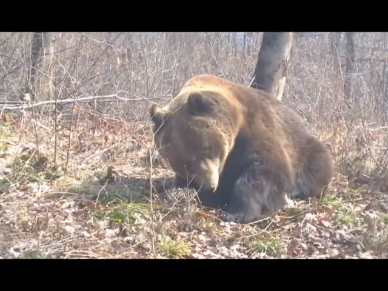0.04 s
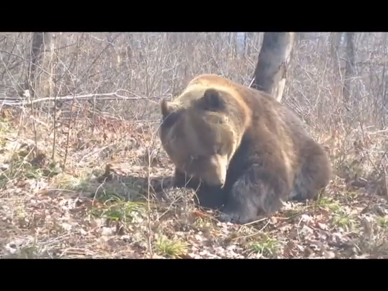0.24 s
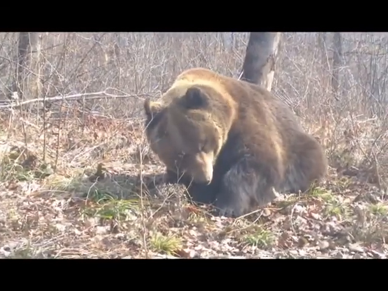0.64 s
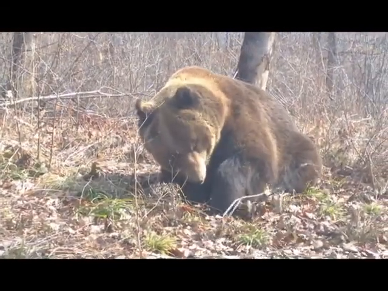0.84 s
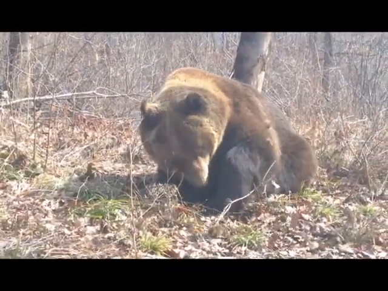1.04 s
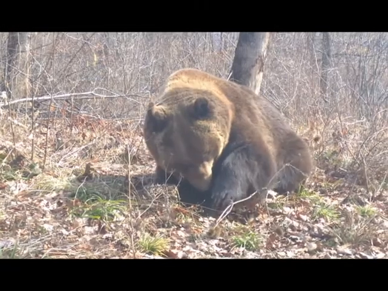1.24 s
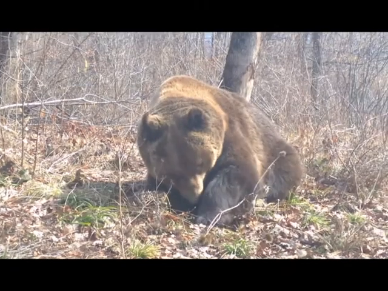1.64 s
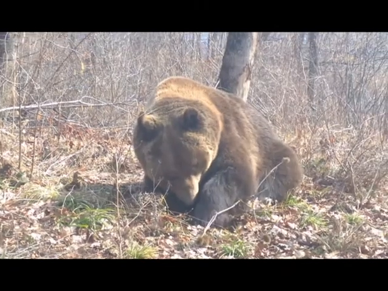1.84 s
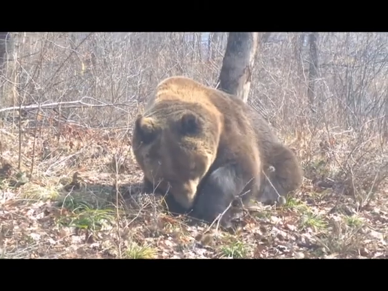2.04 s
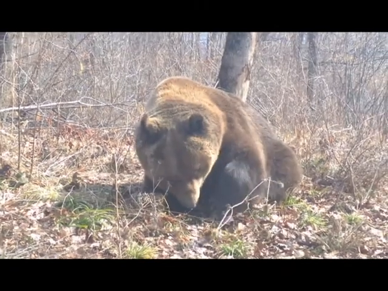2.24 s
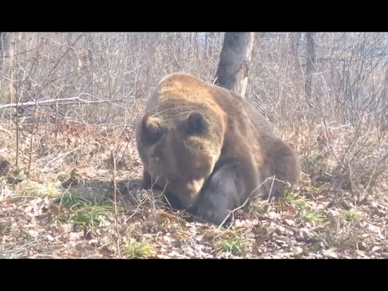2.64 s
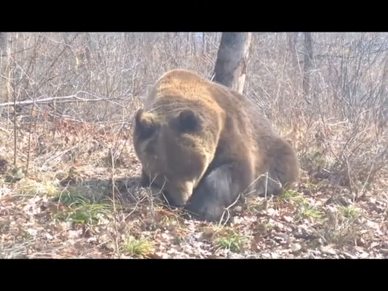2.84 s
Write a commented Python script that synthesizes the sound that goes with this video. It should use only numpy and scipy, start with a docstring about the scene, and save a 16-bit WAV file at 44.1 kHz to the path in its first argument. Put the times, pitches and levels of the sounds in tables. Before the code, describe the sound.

A bear digs in dry leaves, snapping twigs, while a crow caws twice.

```python
"""A bear digs in dry leaves at the edge of a wood: litter crunches under its paws, twigs snap.
A crow gives two rattling caws, each a raspy tone chopped into bursts. A songbird whistles
falling slurs among short chirps; the trunks scatter echoes. A hand-held camera knocks and
scuffs softly, close to its right microphone. Woodland hiss and low rumble lie underneath."""
import sys
import numpy as np
from scipy import signal
from scipy.fft import rfft, irfft
from scipy.io import wavfile
from scipy.ndimage import uniform_filter1d

SR = 44100
rng = np.random.default_rng(int(sys.argv[2]) if len(sys.argv) > 2 else 0)


def put_to_file(sound):
    """Save the sound as 16-bit audio at rate SR, in the file named by the first command-line argument."""
    columns = np.atleast_2d(sound).T  # one column per channel
    safe = np.clip(columns, -1, 1)
    whole_steps = np.round(safe * 32767)
    wavfile.write(sys.argv[1], SR, whole_steps.astype(np.int16))


N = 132300
TIME_S = np.arange(N) / SR

# Stereo image. Each row: frequency in Hz, left-right correlation.
STEREO_LIKENESS = [(30, 0.56), (300, 0.64), (700, 0.99), (1500, 0.52), (4000, 0.77), (8000, 0.35),
                   (15000, 0.16)]
# Echo among the trunks. Each row: frequency in Hz, time to fall 60 dB in seconds.
WOOD_DECAY = [(200, 0.4), (1200, 0.66), (4000, 0.72), (15000, 0.05)]
# Distant woodland hiss. Each row: frequency in Hz, gain in dB.
HISS_SPECTRUM = [(30, 12), (200, 6.5), (500, 1), (1200, -1.5), (2000, -5), (3500, -11), (6000, -12),
                 (9500, -28), (12500, -6.5), (16000, -22)]
# Rumble at the microphones. Each row: frequency in Hz, left gain in dB, right gain in dB.
RUMBLE_SPECTRUM = [(14.8, -15, -4.5), (45, -1, 3.5), (68, -10, 2), (121, -14.5, -2), (210, -20, -15),
                   (376, -56, -21.5), (1000, -69, -29), (16000, -88, -95)]
# Paw strokes. Each row: time in seconds, crunch level in dB, crackle level in dB.
PAW_ENVELOPE = [(0, -77, -78.5), (.6, -73.5, -76), (.84, -69, -75.5), (.895, -65, -73), (.925, -45, -45.5),
                (.965, -48, -49), (1.0, -57.5, -57.5), (1.08, -54.5, -54), (1.19, -57.5, -64),
                (1.27, -69.5, -73.5), (1.37, -72, -76), (1.45, -59.5, -65.5), (1.6, -63.5, -63),
                (1.7, -65, -76.5), (1.8, -67, -73.5), (1.989, -59, -74), (2.06, -53.5, -55.5),
                (2.15, -49, -46.5), (2.185, -57.5, -56.5), (2.32, -54, -58.5), (2.4, -60, -64.5),
                (2.455, -64, -60.5), (2.51, -72, -69.5), (2.62, -68, -69.5), (2.714, -58.5, -51),
                (2.735, -60.5, -68.5), (2.82, -62, -63.5), (2.86, -66, -71), (3.0, -71.5, -68)]
# Leaf crunch and treble crackle. Each row: frequency in Hz, gain in dB.
CRUNCH_SPECTRUM = [(100, -5), (600, -12.5), (1400, -3.5), (2200, -8.5), (3500, 0.5), (5000, -1.5),
                   (6800, -6.5), (9000, -23), (16000, -34)]
CRACKLE_SPECTRUM = [(100, -65), (3000, -31), (6000, -1.5), (8000, -2), (12500, -1), (16000, -11)]
# Caws; the first is heard only as echo. Each row: start in seconds, level in dB.
CAW_EVENTS = [(-.45, -30), (1.7851, -36.5), (2.1664, -36)]
# Crow's tone. Each row: harmonic number, level in dB.
CROW_HARMONICS = [(2, -19.5), (3, -1), (4, -29), (5, -28), (8, -22.5)]
# Crow's rasp. Each row: frequency in Hz, gain in dB.
RASP_SPECTRUM = [(300, -39), (800, -17), (1250, 8), (1600, -7.5), (2100, -22), (3200, -7), (5000, -25),
                 (15000, -60)]
# Reflections off the nearest trunks. Each row: delay in seconds, gain in dB.
TRUNK_REFLECTIONS = [(.0075, -21), (0.028, -13.5)]
# Falling whistles. Each row: start and length in seconds, level in dB, base pitch in Hz, echo in dB.
WHISTLE_NOTES = [(0.306, 0.18, -55.5, 3854, -8), (0.851, 0.23, -63.5, 3850, 0),
                 (1.484, 0.22, -63.5, 3680, 3)]
# Chirps. Each row: start and length in seconds, level in dB, first, middle and last pitch in Hz.
CHIRP_NOTES = [(.01, 0.015, -68.5, 3820, 3530, 3530), (0.107, 0.019, -73.5, 2490, 3240, 3680),
               (1.294, 0.036, -62.5, 4000, 4400, 3660), (1.377, 0.026, -60, 4930, 3900, 3050),
               (1.452, 0.0162, -55, 4450, 3480, 2800), (1.522, 0.0167, -53.5, 3860, 3570, 3180)]
# Knocks on the case. Each row: start in seconds, relative level in dB, tilt in dB per octave.
KNOCK_EVENTS = [(0.2425, -27.5, -5), (0.3639, -20.5, 3.5), (0.456, -25.5, -1.5), (0.4839, -26, -1.5),
                (0.5785, -24, -2.5), (0.6692, -25.5, 1.5), (0.7046, -22, -0.5), (0.787, -22, -0.5),
                (1.0835, -23, -.5), (1.1635, -23.5, 3), (2.2409, -31, 5.5), (2.57, -31, -1)]
# Paths through the case to each microphone. Each row: frequency in Hz, gain in dB.
CASE_LEFT_PATH = [(25, -91), (70, -8.5), (120, -22), (320, -16.5), (460, -17), (650, -22.5), (1100, -25.5),
                  (1500, -43), (2100, -34.5), (5000, -53.5), (15000, -88)]
CASE_RIGHT_PATH = [(25, -16.5), (62, -0.5), (110, -1.5), (210, 1), (300, -5.5), (350, -18.5), (410, 0),
                   (470, 0.5), (600, -11.5), (720, -10.5), (790, -28), (930, -9), (1250, -18.5),
                   (1550, -22.5), (3200, -30), (5000, -43.5), (15000, -67.5)]
# Case flexing, left then right. Each row: centre in Hz, Q.
FLEX_MODES = [(626, 2.3), (66, 0.62)]
# Twig snaps. Each row: start in seconds, level in dB, decay in seconds, tilt in dB per octave,
# ring in Hz.
SNAP_EVENTS = [(.3378, -46, 0.0009, -4.5, 4270), (0.6398, -53, 0.0077, 4, 3180),
               (0.8554, -39, 0.0012, 0, 6700), (0.863, -38, 0.0028, -2, 3540),
               (0.8659, -28.5, 0.0029, -3.5, 4170), (.8695, -38.5, 0.0027, 11, 4500),
               (0.8759, -41, 0.0075, -2.5, 3940), (0.8768, -30, 0.0018, 0.5, 11800),
               (0.8811, -38.5, 0.0026, 12, 6200), (0.9126, -36, 0.00093, -3, 6800),
               (.9285, -44, .0012, -7, 4960), (0.96, -43.5, 0.0027, -1, 7040),
               (1.0138, -53.5, 0.0011, 1, 6570), (1.072, -46, .001, 11, 6800),
               (1.191, -48.5, 0.0049, -6.5, 6140), (1.7261, -47, 0.0015, 5, 3450),
               (1.7432, -38, 0.0034, -1.5, 3550), (1.874, -43, 0.0014, -2, 4130),
               (1.947, -29.5, 0.0011, -6.5, 1470), (1.975, -37.5, 0.0011, -7, 2940),
               (1.9847, -41.5, 0.00064, -10, 3600), (2.016, -46.5, 0.0012, 15, 6500),
               (2.0277, -49, 0.00088, -2, 6000), (2.0601, -33, 0.0014, 2, 3450),
               (2.098, -41, 0.0017, -5, 6160), (2.4248, -52, 0.0047, -4, 4930),
               (2.439, -50, 0.0088, 4, 5040), (2.456, -49, 0.0081, 3, 5850), (2.468, -48, 0.0028, 4, 5000),
               (2.567, -50.5, 0.0018, -0.5, 11460), (2.812, -66, 0.0014, -1, 6840),
               (2.9104, -53.5, 0.0021, -3, 4300), (2.932, -50.5, 0.00071, -1, 5300)]
# Breaking twig. Each row: frequency in Hz, gain in dB.
TWIG_SPECTRUM = [(60, -22), (300, -30), (700, -3.5), (1700, -10), (3000, -4), (4200, -0.5), (6000, -6.5),
                 (9000, -9.5), (13000, -13.5), (16000, -34)]
# Rub on the case. Each row: time in seconds, level in dB.
SCUFF_ENVELOPE = [(1.39, -87), (1.403, -49), (1.426, -37), (1.437, -43.5), (1.455, -44.5), (1.5, -53),
                  (1.57, -68.5), (1.62, -102.5)]
# Colour of the rub. Each row: frequency in Hz, left gain in dB, right gain in dB.
SCUFF_SPECTRUM = [(60, -36, -6.5), (198, -12, -11.5), (313, -23, 1.5), (448, -18, 3), (600, -24, -10.5),
                  (1060, -32, -22), (2240, -22, -30), (4000, -49, -50), (14600, -52, -60)]


def amp(db):
    """Decibels to gain."""
    return 10 ** (np.asarray(db) / 20)


def unit(x):
    """Scales to rms 1."""
    return x / np.sqrt(np.mean(x ** 2) + 1e-20)


def read(points, hz):
    """Interpolates a table on a log-frequency axis."""
    points_hz, value = np.transpose(points)
    return np.interp(np.log(hz + 1), np.log(points_hz + 1), value)


def bins_hz(x):
    """Frequencies of the spectrum of x."""
    return np.fft.rfftfreq(x.shape[-1], 1 / SR)


def colour(x, points):
    """Filters x by rows of Hz, dB."""
    return irfft(rfft(x) * amp(read(points, bins_hz(x))), x.shape[-1])


def minimum_phase(db):
    """Impulse response with this spectrum; starts at once and dies away."""
    log_gain = np.log(amp(np.concatenate([db, db[-2:0:-1]])))
    return np.fft.ifft(np.exp(np.conj(signal.hilbert(log_gain)))).real


def add(mix, start_s, sound):
    """Mixes a sound in at start_s."""
    part = mix[..., max(round(start_s * SR), 0):][..., :sound.shape[-1]]
    part += sound[..., :part.shape[-1]]


def wander(cutoff_hz):
    """Low-passed noise, rms 1."""
    return unit(irfft(rfft(rng.standard_normal(N)) / (1 + (bins_hz(TIME_S) / cutoff_hz) ** 4), N))


def smooth_noise(count, width):
    """Moving average of noise, rms 1."""
    return unit(uniform_filter1d(rng.standard_normal(count), size=width))


def spread(pair):
    """Two independent signals to a partly correlated left and right."""
    a, b = rfft(pair)
    likeness = np.clip(read(STEREO_LIKENESS, bins_hz(pair)), 0, 1)
    mid, side = a * np.sqrt((1 + likeness) / 2), b * np.sqrt((1 - likeness) / 2)
    return irfft(np.array([mid + side, mid - side]), pair.shape[-1])


def microphone_noise(spectrum):
    """Independent coloured noise at each microphone."""
    hz, *sides_db = np.transpose(spectrum)
    return unit(np.array([colour(rng.standard_normal(N), np.c_[hz, db]) for db in sides_db]))


def wood_echo(x, echoes_per_s=1500):
    """Scattered echoes from the trunks, different at each microphone."""
    taps = rng.standard_normal((2, SR)) * (rng.random((2, SR)) < echoes_per_s / SR)
    hz, t, frames = signal.stft(taps, SR, nperseg=256)
    tail = signal.istft(frames * amp(-60 * t / read(WOOD_DECAY, hz)[:, None]), SR)[1]
    return signal.fftconvolve(np.atleast_2d(x), tail / np.linalg.norm(tail[0]), axes=1)[:, :x.shape[-1]]


def background(hiss_db=-69.5, rumble_db=-58, lumps_db=2):
    """Steady woodland hiss and a lumpy rumble at the microphones."""
    hiss = amp(hiss_db) * unit(colour(spread(rng.standard_normal((2, N))), HISS_SPECTRUM))
    return hiss + microphone_noise(RUMBLE_SPECTRUM) * amp(rumble_db + lumps_db * wander(cutoff_hz=38))


def leaf_litter(spectrum, level_db, grains_per_s=1500, size_spread_db=4.0, wash=0.7, flutter_db=1.5):
    """Thousands of tiny leaf fractures over a wash of sliding leaves."""
    sizes = amp(size_spread_db * np.minimum(rng.exponential(1, (2, N)), 5))
    signs = np.sign(rng.standard_normal((2, N)))
    grains = unit(sizes * signs * (rng.random((2, N)) < grains_per_s / SR))
    leaves = unit(colour(spread(grains + wash * rng.standard_normal((2, N))), spectrum))
    return leaves * amp(level_db + flutter_db * wander(cutoff_hz=31))


def bear_digging(left_db=-3, right_db=-1.5):
    """Paw strokes crunch and crackle through the litter and break twigs."""
    times_s, crunch_db, crackle_db = np.transpose(PAW_ENVELOPE)
    crunch = leaf_litter(CRUNCH_SPECTRUM, np.interp(TIME_S, times_s, crunch_db))
    crackle = leaf_litter(CRACKLE_SPECTRUM, np.interp(TIME_S, times_s, crackle_db))
    return (crunch + crackle + twig_snaps()) * amp([[left_db], [right_db]])


def caw(bursts=11, bursts_per_s=55.4, pitch_hz=393.8, rasp_db=-11.5):
    """A raspy nasal tone chopped into bursts; they swell and slow at first, and pitch lifts in each."""
    rise_s, hold_s, fall_s = 0.0016, 0.0086, 0.0019
    hurry_s, jitter_s = 0.0045, 0.00034
    onset_db, swell_s = -10.5, 0.02
    bend_depth, waver_depth, roughness = 0.056, 0.02, 0.043
    t = np.arange(SR // 4) / SR
    gate, bend = np.zeros((2, len(t)))
    for k in range(bursts):
        start_s = k / bursts_per_s - hurry_s * (1 - np.exp(-k / 2))
        age_s = np.maximum(t - start_s + jitter_s * rng.standard_normal(), 0)
        burst = np.minimum(age_s / rise_s, 1) * np.exp(-np.maximum(age_s - hold_s, 0) / fall_s)
        gate += burst * amp(onset_db * np.exp(-start_s / swell_s))
        bend += burst * (age_s / hold_s - .5)
    waver = smooth_noise(len(t), width=40)
    cycles = np.cumsum(pitch_hz * (1 + bend_depth * (bend - bend.mean()) + waver_depth * waver)) / SR
    tone = sum(amp(db) * np.sin(2 * np.pi * round(k) * cycles) for k, db in CROW_HARMONICS)
    rasp = amp(rasp_db) * unit(colour(rng.standard_normal(len(t)), RASP_SPECTRUM))
    return gate * (tone * (1 + roughness * waver) + rasp)


def crow(right_lag_s=0.0001, echo_db=-8, flicker_depth=0.9):
    """Caws, their reflections off the nearest trunks and a flickering echo in the wood."""
    voice = np.zeros(N + SR)  # 1 s lead-in holds the earliest caw
    for start_s, db in CAW_EVENTS:
        add(voice, start_s + 1, amp(db) * caw())
    voice += sum(amp(db) * np.roll(voice, round(delay_s * SR)) for delay_s, db in TRUNK_REFLECTIONS)
    near = np.array([voice, np.roll(voice, round(right_lag_s * SR))])
    flicker = unit(1 + flicker_depth * np.resize(wander(cutoff_hz=55), len(voice)))
    return (near + amp(echo_db) * wood_echo(voice * flicker))[:, SR:]


def bird_note(pitch_hz, db):
    """A pure tone along a pitch curve, with soft ends."""
    envelope = np.sqrt(np.sin(np.linspace(0, np.pi, len(pitch_hz))).clip(0))
    return amp(db) * envelope * np.sin(2 * np.pi * np.cumsum(pitch_hz) / SR)


def songbirds(swoop_hz=1404, swoop_s=0.018, sag_hz_per_s=4500, chirp_echo_db=-4, flutter_db=3.5):
    """Whistles swoop down, then sag; chirps are short bent notes. Far birds are mostly echo."""
    song, echo_send = np.zeros((2, N))
    for start_s, length_s, db, base_hz, echo_db in WHISTLE_NOTES:
        t = np.arange(0, length_s, 1 / SR)
        note = bird_note(base_hz + swoop_hz * np.exp(-t / swoop_s) - sag_hz_per_s * t, db)
        add(song, start_s, note)
        add(echo_send, start_s, amp(echo_db) * note)
    for start_s, length_s, db, *pitches_hz in CHIRP_NOTES:
        parabola = np.polyfit([0, .5, 1], pitches_hz, 2)
        note = bird_note(np.polyval(parabola, np.linspace(0, 1, round(length_s * SR))), db)
        add(song, start_s, note)
        add(echo_send, start_s, amp(chirp_echo_db) * note)
    return song * unit(amp(flutter_db * wander(cutoff_hz=54))) + wood_echo(echo_send)


def case_flex(x, centre_hz, q):
    """All-pass: the flexing case delays frequencies near centre_hz."""
    s = 1j * bins_hz(x) / centre_hz
    return irfft(rfft(x) * (s * s - s / q + 1) / (s * s + s / q + 1), len(x))


def case_knocks(gain_db=33, tilt_corner_hz=494, uneven_db=3, left_lag_s=0.0003):
    """Each knock is one click through the camera case to both microphones."""
    out, hz = np.zeros((2, N)), np.fft.rfftfreq(4096, 1 / SR)
    octaves = np.log2(1 + hz / tilt_corner_hz)
    for start_s, db, tilt in KNOCK_EVENTS:
        touch_db = gain_db + db + tilt * octaves + uneven_db * smooth_noise(len(hz), width=30)
        add(out[0], start_s + left_lag_s, minimum_phase(read(CASE_LEFT_PATH, hz) + touch_db))
        add(out[1], start_s, minimum_phase(read(CASE_RIGHT_PATH, hz) + touch_db))
    return np.array([case_flex(side, *mode) for side, mode in zip(out, FLEX_MODES)])


def twig_snaps(rise_s=0.00008, ring_db=9, ring_octaves=0.23, uneven_db=3, gain=1.303, echo_db=-11):
    """Each twig cracks in a burst of a few milliseconds, with one broad ring and chance resonances."""
    out, t = np.zeros((2, N)), np.arange(2048) / SR
    hz = bins_hz(t)
    for start_s, db, decay_s, tilt, ring_hz in SNAP_EVENTS:
        peak_db = ring_db / (1 + (np.log2((hz + 1) / ring_hz) / ring_octaves) ** 2)
        ripple_db = uneven_db * smooth_noise(len(hz), width=24)
        spectrum_db = read(TWIG_SPECTRUM, hz) + peak_db + ripple_db + tilt * np.log2(.2 + hz / 4000)
        fibres = unit(colour(spread(rng.standard_normal((2, len(t)))), np.c_[hz, spectrum_db]))
        envelope = np.minimum(t / rise_s, 1) * np.exp(-t / decay_s)
        add(out, start_s, gain * amp(db) * fibres * envelope)
    return out + amp(echo_db) * wood_echo(out)


def case_scuff(trim_db=-1.5):
    """A short, low rub on the camera case."""
    level_db = np.interp(TIME_S, *np.transpose(SCUFF_ENVELOPE), left=-120, right=-120)
    return microphone_noise(SCUFF_SPECTRUM) * amp(level_db + trim_db)


def scene():
    """All sources, in stereo."""
    return bear_digging() + crow() + songbirds() + case_knocks() + case_scuff() + background()


def record(dry):
    """Band limit: low-pass at 16.2 kHz."""
    lowpass = signal.firwin(401, 16200, window=("kaiser", 9), fs=SR)
    return signal.oaconvolve(dry, lowpass[None], "same")


dry = scene()
out = record(dry)
put_to_file(out)
```